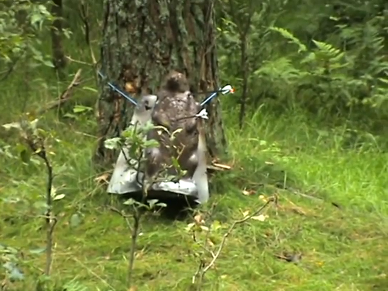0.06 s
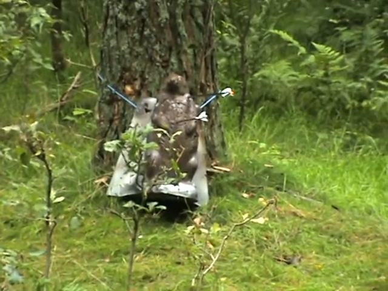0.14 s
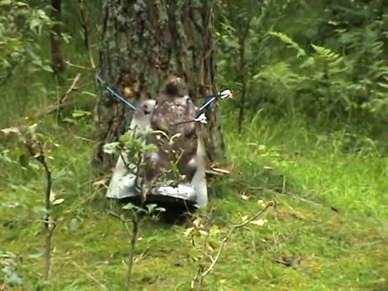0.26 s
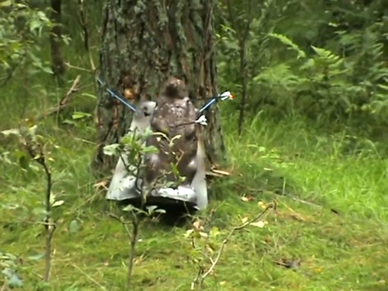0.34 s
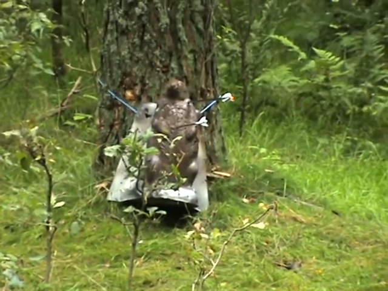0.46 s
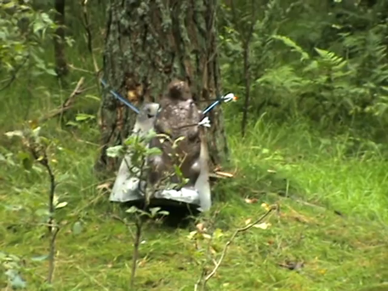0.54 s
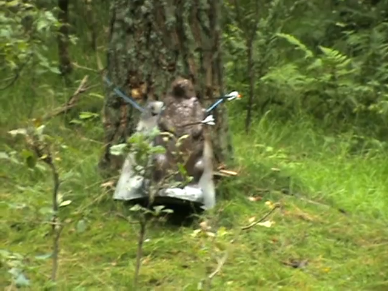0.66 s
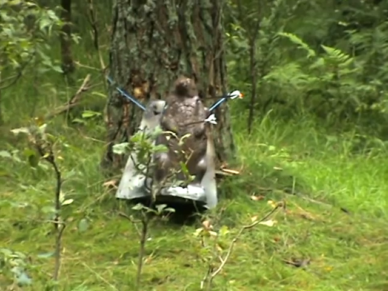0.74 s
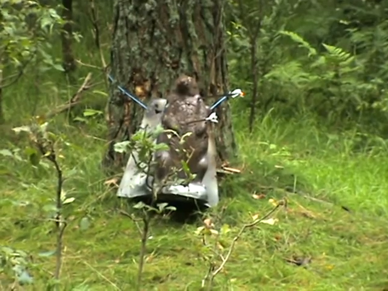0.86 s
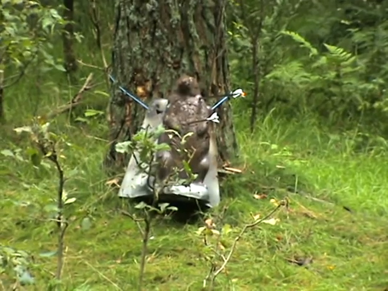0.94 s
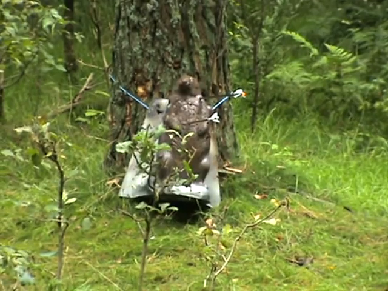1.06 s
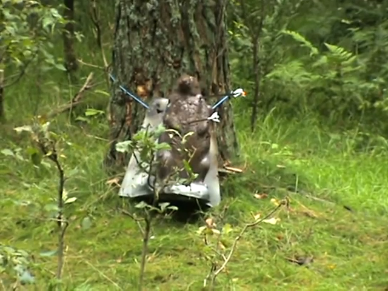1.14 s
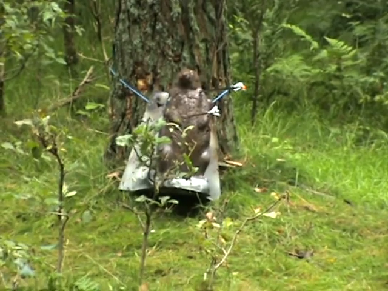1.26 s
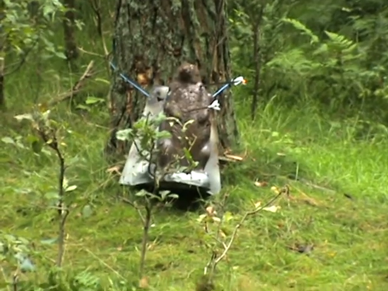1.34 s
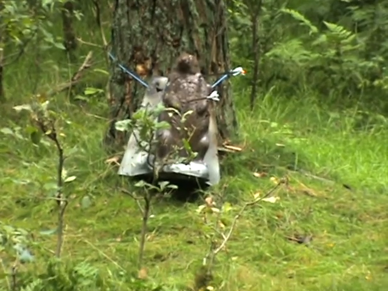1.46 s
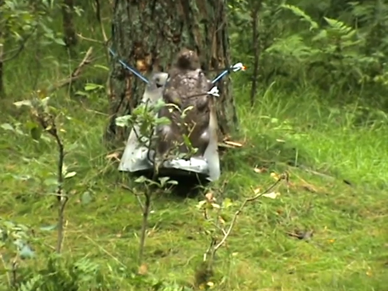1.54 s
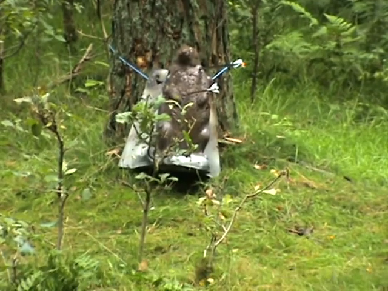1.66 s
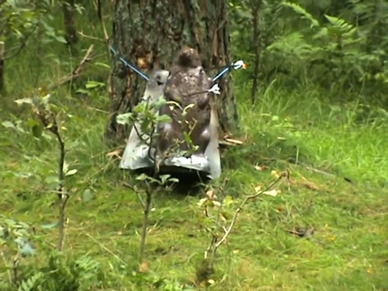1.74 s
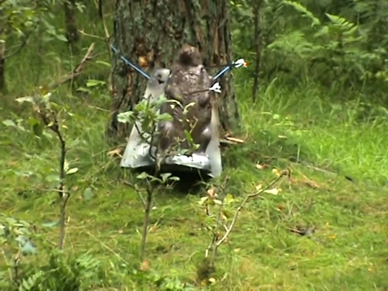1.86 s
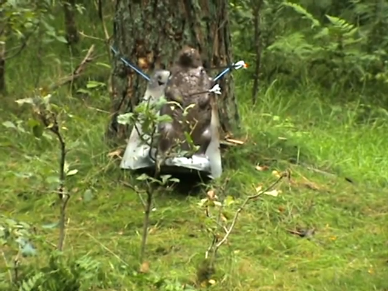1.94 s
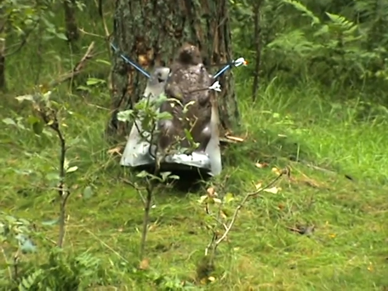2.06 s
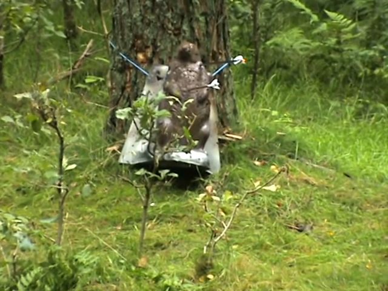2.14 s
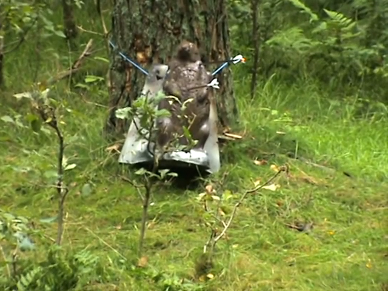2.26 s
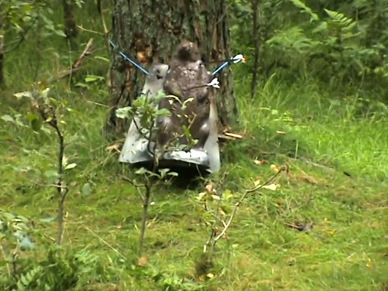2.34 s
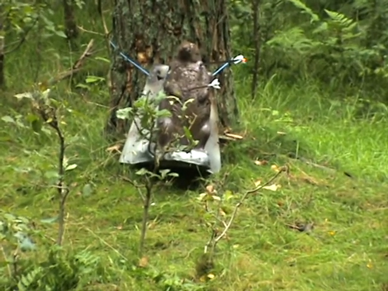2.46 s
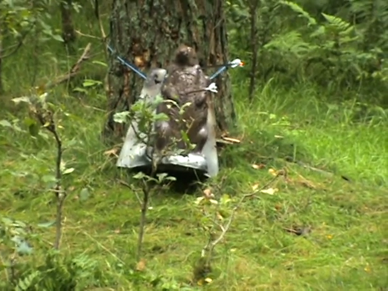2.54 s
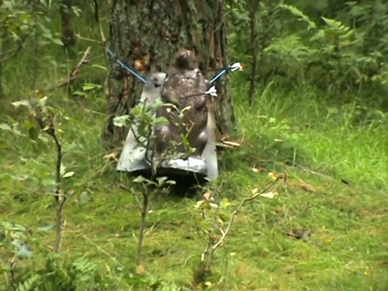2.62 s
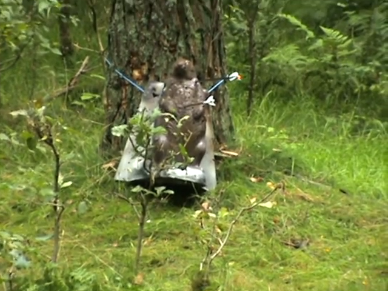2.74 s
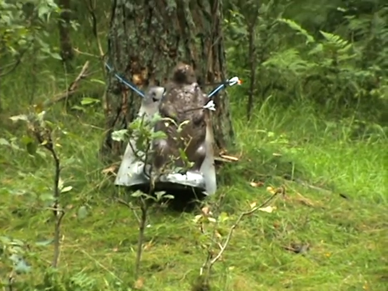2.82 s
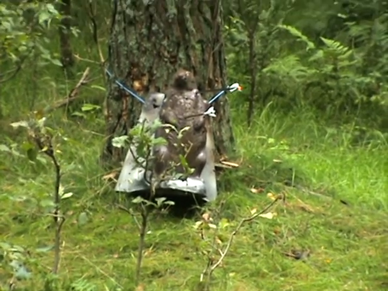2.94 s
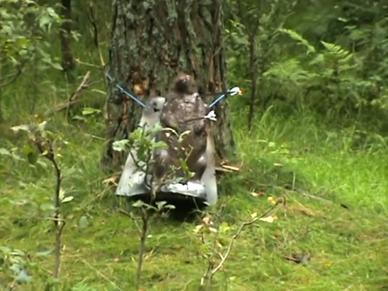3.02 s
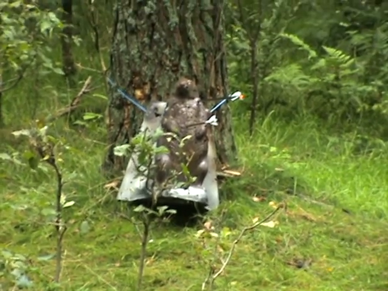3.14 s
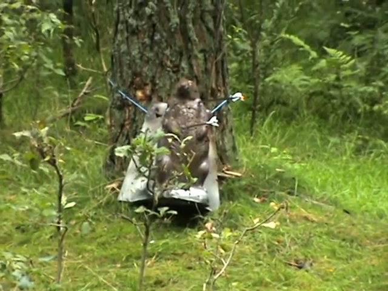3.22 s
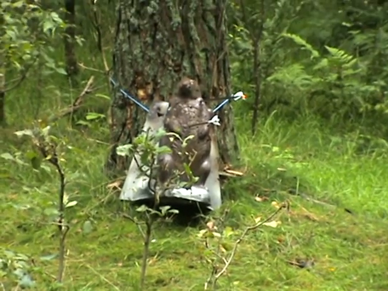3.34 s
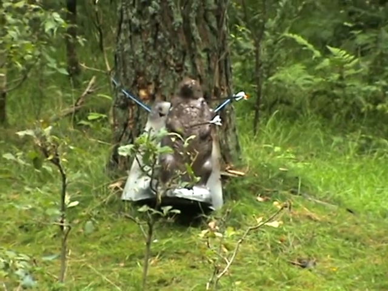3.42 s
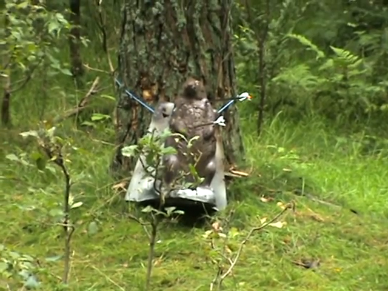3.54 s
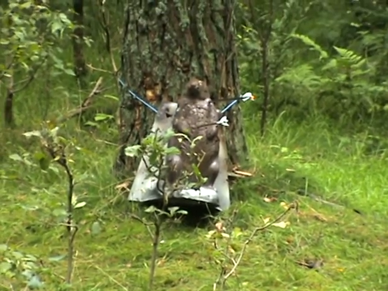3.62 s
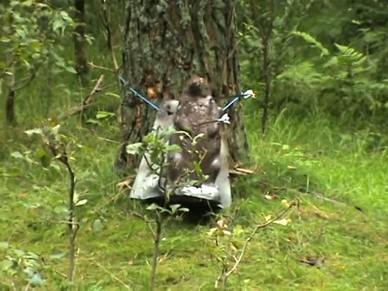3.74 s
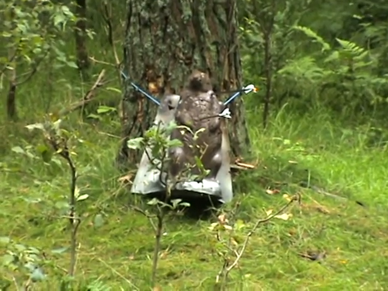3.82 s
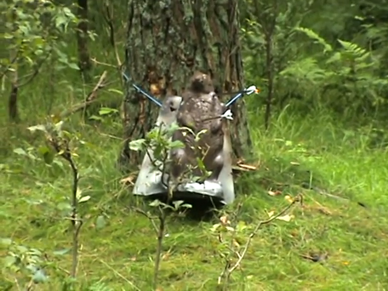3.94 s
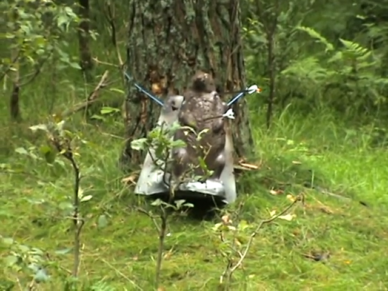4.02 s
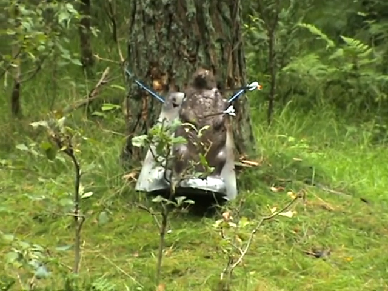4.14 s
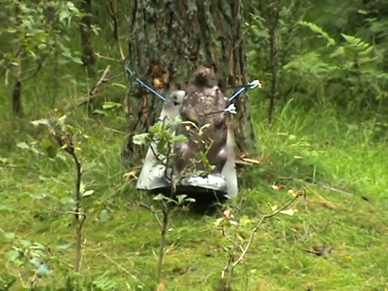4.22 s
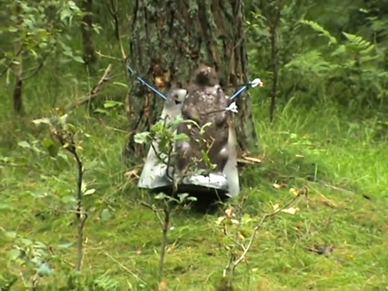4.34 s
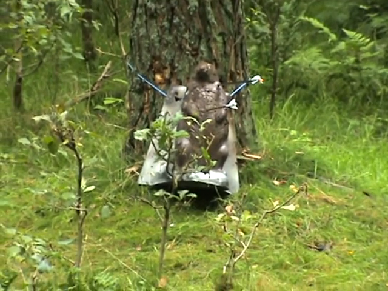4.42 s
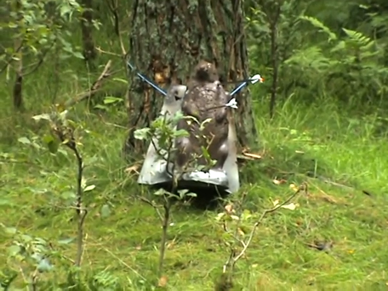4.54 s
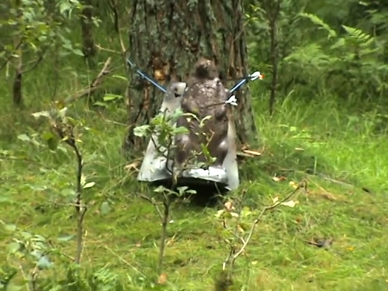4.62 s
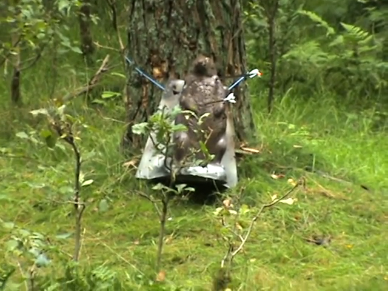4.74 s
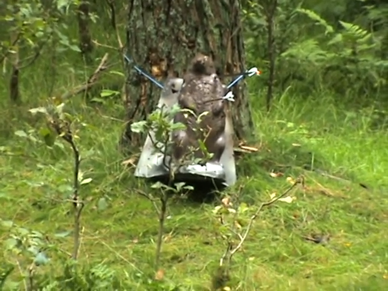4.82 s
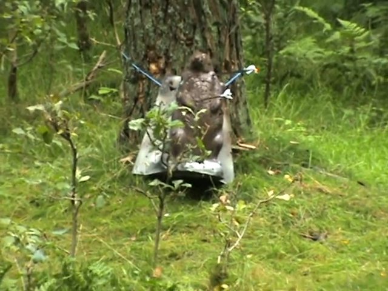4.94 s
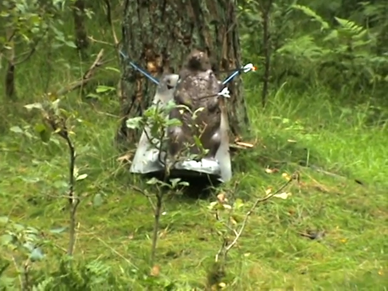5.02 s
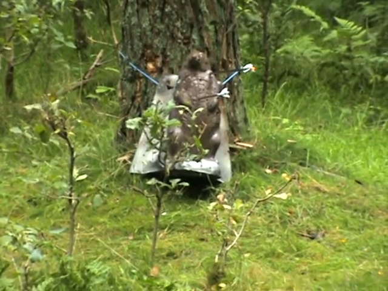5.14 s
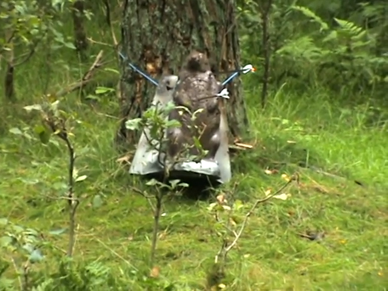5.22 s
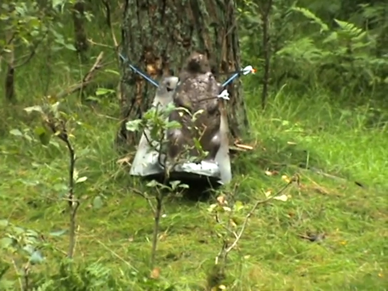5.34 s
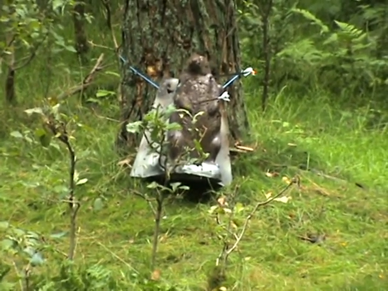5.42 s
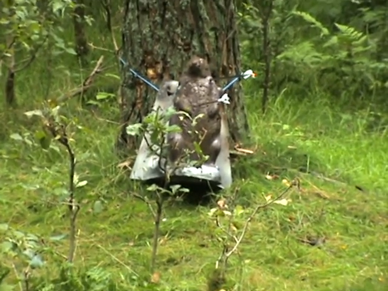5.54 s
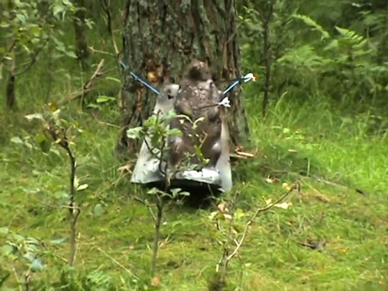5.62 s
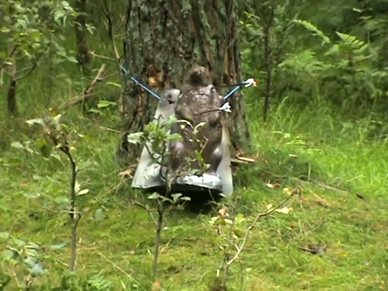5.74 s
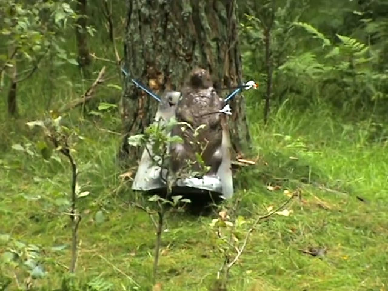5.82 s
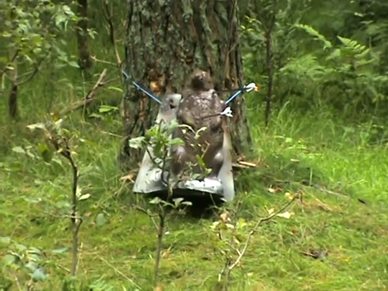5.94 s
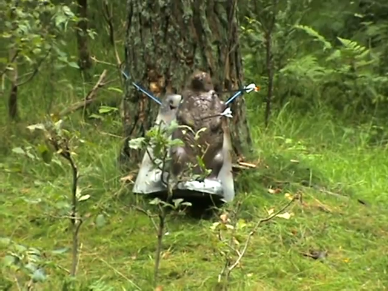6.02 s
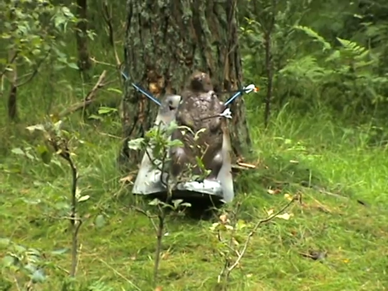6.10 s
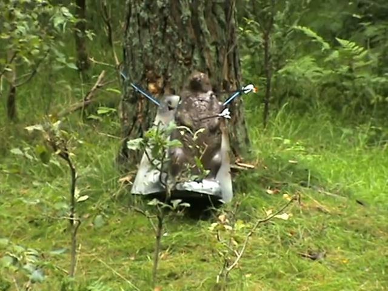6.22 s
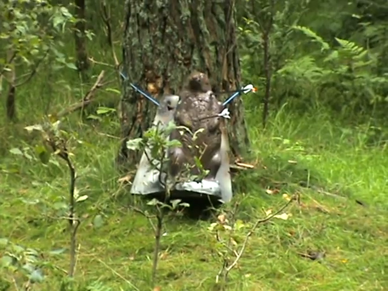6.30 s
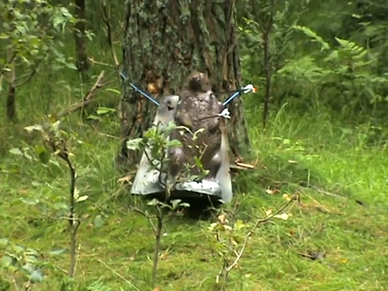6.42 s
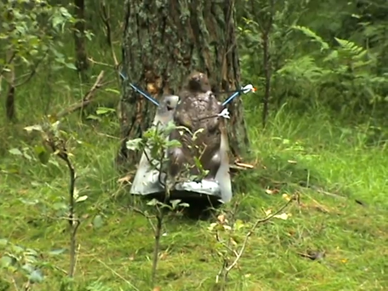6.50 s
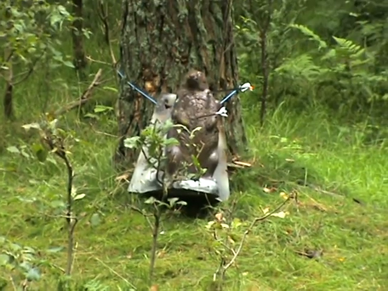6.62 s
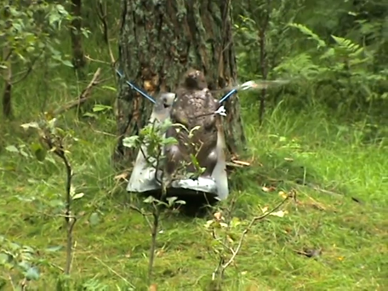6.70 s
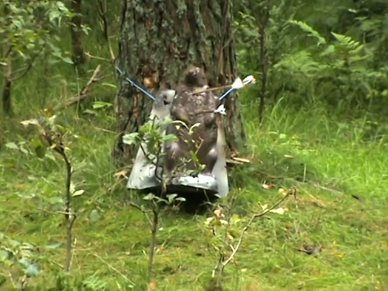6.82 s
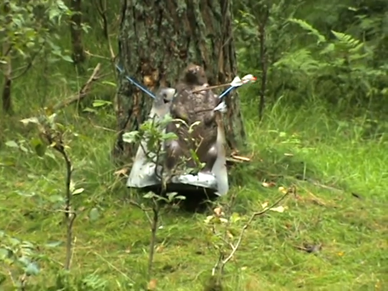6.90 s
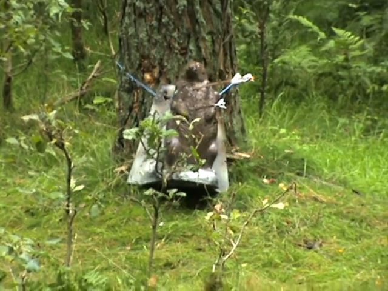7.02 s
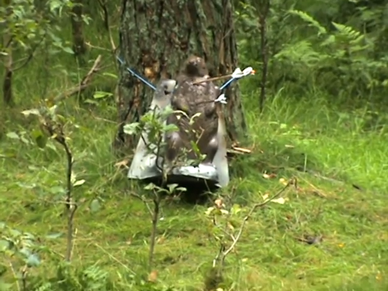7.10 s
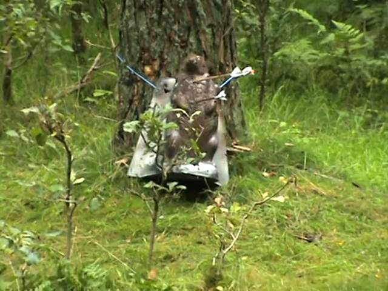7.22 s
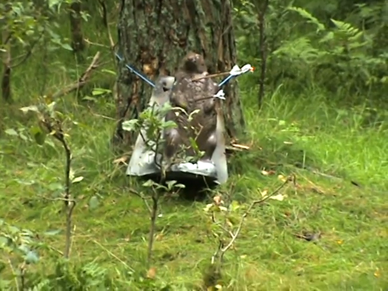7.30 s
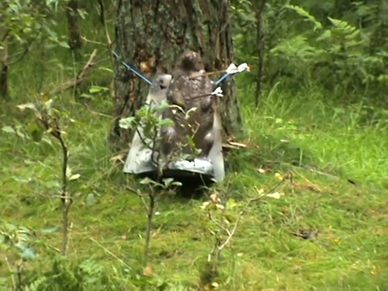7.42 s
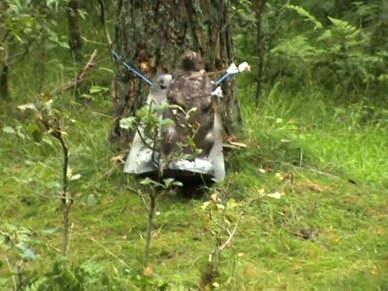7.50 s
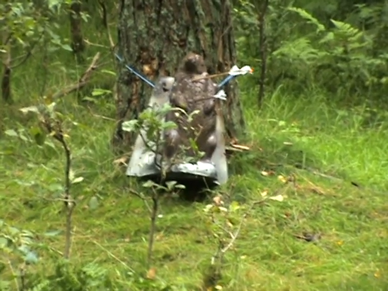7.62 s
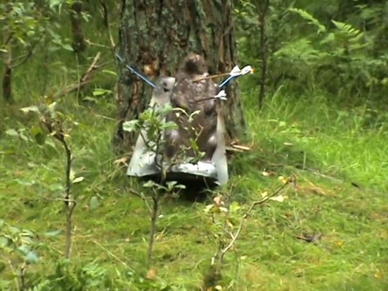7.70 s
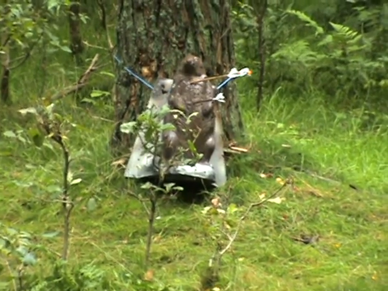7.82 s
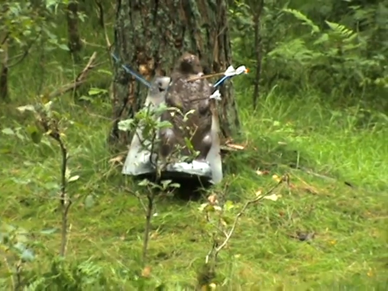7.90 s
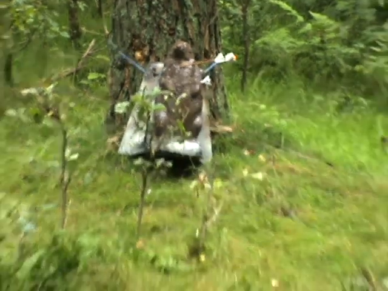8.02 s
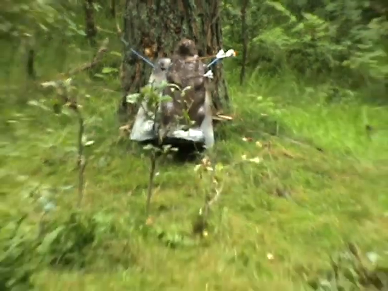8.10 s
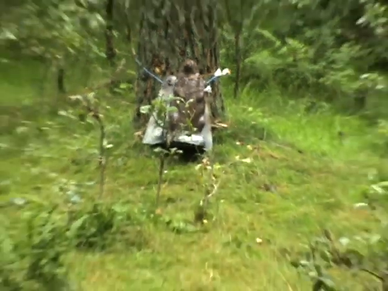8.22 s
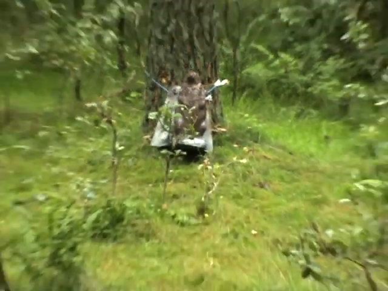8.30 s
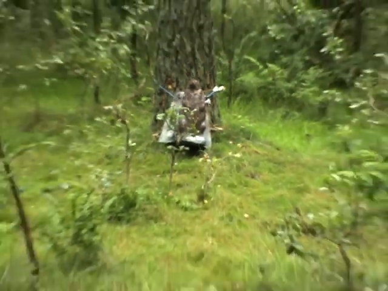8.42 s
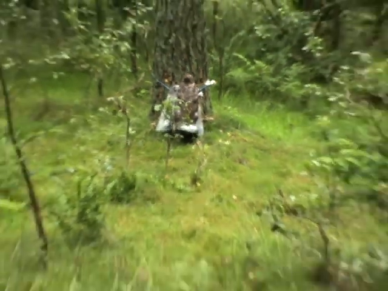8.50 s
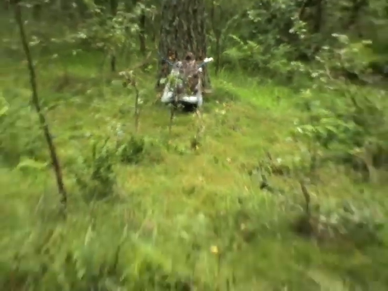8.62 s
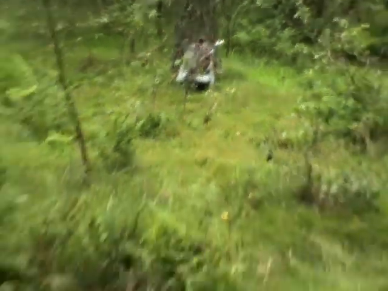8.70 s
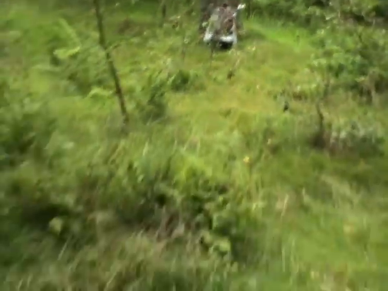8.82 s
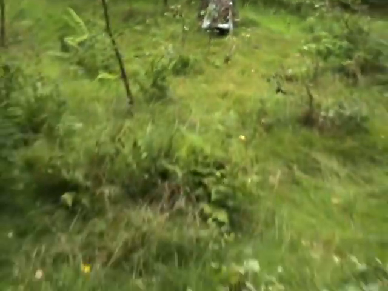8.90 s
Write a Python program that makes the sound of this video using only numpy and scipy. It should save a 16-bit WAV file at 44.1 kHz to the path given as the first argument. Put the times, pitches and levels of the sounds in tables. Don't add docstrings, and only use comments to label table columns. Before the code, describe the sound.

In a quiet wood, faint handling clicks and thin birdsong, then a bowstring slaps and an arrow cracks into a foam target with woodland echo.

```python
import sys
import numpy as np
from scipy import signal
from scipy.fft import rfft, irfft, next_fast_len
from scipy.io import wavfile
from scipy.ndimage import uniform_filter1d

SR = 44100
rng = np.random.default_rng(int(sys.argv[2]) if len(sys.argv) > 2 else 0)


def field_ratio(decibels):
    return 10 ** (np.asarray(decibels, dtype=float) / 20)


def file_out(sig):
    cols = np.atleast_2d(sig).T
    lim = np.clip(cols, -1, 1)
    pcm = np.round(lim * 32767).astype(np.int16)
    wavfile.write(sys.argv[1], SR, pcm)


N = 394694
SHOT_S = 6.5

# [t/s, peak level/dB, brightness/dB]
SLAPS = [(6.5774, -26, -16), (6.5785, -24.5, -18.5), (6.5810, -22, -11.5), (6.582, -25.5, -19),
         (6.5894, -23, -8.5), (6.5940, -17, -8.5), (6.5948, -6, -7), (6.5963, -11.5, 4.5),
         (6.5990, -19.5, -8.5), (6.6015, -19.5, -14), (6.605, -23, -9), (6.6073, -16.5, -7),
         (6.6092, -16, 4), (6.611, -20, -5.5), (6.6136, -8.5, -11.5), (6.6176, -7, -16),
         (6.6205, -21, -10.5), (6.6214, -8, -11), (6.6233, -23, 4), (6.625, -16.5, 4), (6.6320, -15, -14),
         (6.644, -22.5, -22.5), (6.652, -25, -10), (6.653, -20, -9), (6.658, -23, -14), (6.661, -19, 0.5),
         (6.665, -17.5, -6.5), (6.6897, -24, -12.5), (6.698, -29, -1.5), (6.706, -25, -2)]
# [f/Hz, level/dB, t60/s]
BOW_MODES = [(823, -13.5, 0.11), (1045, -4, 0.06), (1187, -7.5, 0.067), (1540, -0.5, 0.043),
             (1800, -16, 0.076), (2157, -1.5, 0.035), (2490, -1, 0.043), (2716, -2, 0.025)]
# [f/Hz, level/dB per Hz]
STRING_HISS = [(150, -20.5), (520, -18.5), (1100, -7), (2000, 3), (3000, -7), (4000, -6), (8500, -14.5),
               (11000, -26), (15500, -37.5)]
# [t/s, f/Hz]
SLAP_PITCH = [(6.581, 2290), (6.5945, 1630), (6.597, 2350), (6.609, 1700), (6.6134, 2500), (6.6175, 2600),
              (6.622, 2100), (6.66, 2500), (6.706, 1900)]


def string_slaps():
    out = np.zeros(SR)
    size = 6000
    for s, peak_db, bright_db in SLAPS:
        t60 = 0.019 if s < 6.68 else 0.012
        t, fade = dying(t60, size)
        grit = rng.standard_normal(size) * fade ** 2.7
        bright = resonate(resonate(grit, 8200, 3200), 7300, 6400)
        burst = rms_one(colour(rng.standard_normal(size), STRING_HISS)) * fade
        spike_hz = np.interp(s, *np.transpose(SLAP_PITCH))
        spike_window = np.sin(np.pi * np.minimum(spike_hz * t / 1.3, 1))
        spike = -np.sin(2 * np.pi * spike_hz * t) * spike_window
        modes = np.zeros(size)
        for hz, db, ring_t60 in BOW_MODES:
            strength, sign = rng.standard_normal(2)
            ring = np.sin(2 * np.pi * hz * t) * dying(ring_t60, size)[1]
            modes += field_ratio(db + 0.98 * strength) * np.sign(sign) * ring
        slap = field_ratio(-12.5) * burst + field_ratio(bright_db) * bright + field_ratio(-18.5) * modes + field_ratio(-2) * spike
        add(out, s - SHOT_S, field_ratio(peak_db) * slap)
    return out


# [t/s, f/Hz, peak level/dB, t60/s]
LIMBS = [
    (6.577, 724, -32.5, .06),
    (6.590, 53, -34, 0.19),
    (6.597, 190, -32.5, 0.36),
    (6.589, 315, -23, 0.054),
    (6.597, 960, -25.5, 0.047),
    (6.6, 750, -34.5, 0.23),
]


def limb_swings():
    out = np.zeros(SR)
    size = SR // 2
    for s, hz, db, t60 in LIMBS:
        t, fade = dying(t60, size)
        level = field_ratio(db + 0.95 * drift(60)[:size])
        add(out, s - SHOT_S, level * np.minimum(t / 0.0041, 1) * np.sin(2 * np.pi * hz * t) * fade)
    return out


def rest_squeak():
    out = np.zeros(SR)
    length_s, start_hz, end_hz = 0.01064, 1350, 3360
    way = np.arange(round(length_s * SR)) / SR / length_s
    hz = start_hz + (end_hz - start_hz) * way
    add(out, 6.5855 - SHOT_S, field_ratio(-25.5) * way ** 0.81 * np.sin(2 * np.pi * np.cumsum(hz) / SR))
    return out


# [t/s, level/dB]
FLIGHT = [
    (6.576, -61.5),
    (6.579, -44),
    (6.592, -30),
    (6.600, -28.5),
    (6.630, -34),
    (6.665, -38),
    (6.680, -46),
    (6.720, -47),
    (6.738, -48),
    (6.746, -66.5),
]
# [f/Hz, level/dB per Hz]
FLIGHT_HISS = [(130, -15.5), (310, -1.5), (520, -6.5), (760, 4.5), (920, -10), (1500, -7), (2500, -14),
               (4200, -12.5), (8400, -13.5), (10500, -20), (15400, -38)]


def torn_air():
    air = rms_one(colour(rng.standard_normal(SR), FLIGHT_HISS))
    t = np.arange(N) / SR
    effort_db = np.interp(t, *np.transpose(FLIGHT), left=-110, right=-110)
    effort_db = uniform_filter1d(effort_db, size=200) + 2.5 * drift(150)
    return air * field_ratio(effort_db[round(SHOT_S * SR):][:SR])


def release():
    return string_slaps() + limb_swings() + rest_squeak() + torn_air()


# [t/s, peak level/dB, start f/Hz, end
# f/Hz, t60/s]
THUDS = [
    (6.7442, -10, 1780, 1565, 0.014),
    (6.7453, -18, 1034, 946, 0.05),
    (6.7458, -21.5, 691, 640, 0.039),
    (6.7611, -10.5, 1000, 955, 0.029),
    (6.7620, -12, 757, 690, 0.025),
    (6.764, -20.5, 392, 335, 0.051),
    (6.7619, -16.5, 183.3, 157, 0.037),
    (6.7745, -27, 850, 800, .025),
    (6.781, -27.5, 1890, 1800, 0.012),
         (6.7583, -6.5, 1620, 1520, 0.019),
]
# [f/Hz, peak level/dB, t60/s]
QUIVER = [(6170, -35.5, .11), (5350, -45.5, 0.56), (7040, -50, 0.28), (3945, -49, 0.5), (4720, -55.5, .6)]


def thuds():
    out = np.zeros(SR)
    for s, peak_db, start_hz, end_hz, t60 in THUDS:
        t, fade = dying(t60, size=8000)
        hz = end_hz + (start_hz - end_hz) * np.exp(-t / 0.0023)
        tone = np.sin(2 * np.pi * np.cumsum(hz) / SR)
        add(out, s - SHOT_S, field_ratio(peak_db) * fade * np.minimum(t / 0.0007, 1) * tone)
    for hz, db, t60 in QUIVER:
        t, fade = dying(t60, size=12000)
        wobble = field_ratio(2.7 * drift(54)[:12000])
        tone = np.sin(2 * np.pi * hz * t)
        add(out, 6.774 - SHOT_S, field_ratio(db) * wobble * fade * np.minimum(t / 0.0037, 1) * tone)
    return out


# [t/s, peak level/dB, t60/s]
CRACKS = [
    (6.74, -29.5, 0.025),
    (6.743, -20, .01),
    (6.7443, -10, 0.015),
    (6.747, -17.5, .012),
    (6.7510, -23, 0.03),
    (6.757, -18.5, 0.015),
    (6.7597, -12.5, 0.013),
]


def cracks():
    out = np.zeros(SR)
    for s, peak_db, t60 in CRACKS:
        add(out, s - SHOT_S, field_ratio(peak_db) * rng.standard_normal(4000) * dying(t60)[1])
    return out


# [f/Hz, width/Hz, level/dB]
SHAFT = [(2694, 120, -5.5), (3600, 89, -17), (3890, 110, -12), (4700, 90, -2), (5290, 110, -0.5),
         (6180, 130, 2), (7040, 140, -1), (7750, 140, -9.5), (8550, 400, -11.5), (9800, 403, -12),
         (10500, 270, -8)]


def shaft(crack):
    out = 0
    for k, (hz, width_hz, db) in enumerate(SHAFT):
        out = out + field_ratio(db) * (-1) ** k * resonate(crack, hz, 1.9 * width_hz)
    return out


# [f/Hz, level/dB per Hz]
BLOW = [(100, 0), (230, 9.5), (500, -6), (800, 3), (1500, -3), (3000, -8.5), (6000, -9), (8500, -22.5),
        (11500, -34), (15000, -45)]


def scattered(hz):
    power = field_ratio(at_hz(BLOW, hz)) ** 2
    for peak_hz, width_hz, db in SHAFT:
        power = power + field_ratio(db + 0.5) ** 2 / (1 + (2 * (hz - peak_hz) / width_hz) ** 2)
    return np.sqrt(power)


def far_blow():
    blow = np.zeros(SR)
    blow[round((6.759 - SHOT_S) * SR)] = 1
    late = np.roll(blow, round(0.32 * SR))
    blow += field_ratio(-17) * resonate(late, 900, 1500)
    return spectral(blow, scattered)


def impact():
    crack = cracks()
    tear = bandpass(crack, 400, 5000, order=1)
    return thuds() + field_ratio(-5) * tear + field_ratio(4) * shaft(crack)


# [f/Hz, t60/s]
WOOD_T60 = [(100, 0.35), (400, 0.48), (1000, 0.69), (2500, 0.72), (6000, 0.61), (10000, 0.53),
            (15000, 0.62)]


def trunks(x):
    white = rng.standard_normal((2, SR))
    t = np.arange(SR) / SR
    edges = 60 * 2 ** np.arange(0, 8.1, .5)
    tail = 0
    for low_hz, high_hz in zip(edges, edges[1:]):
        t60 = at_hz(WOOD_T60, np.sqrt(low_hz * high_hz))
        tail = tail + bandpass(white, low_hz, high_hz) * dying(t60, size=SR)[1]
    mid, side = tail * np.minimum(t / 0.0053, 1) / np.sqrt(SR * 0.053)
    echoes = np.array([mid + 0.436 * side, mid - 0.2 * side])
    return signal.fftconvolve(x[None], echoes, axes=1)


def click(hz, bright_db, top_hz, t60, attack_s):
    t, fade = dying(t60)
    white = rng.standard_normal(4000)
    knock = np.sin(2 * np.pi * hz * t) * fade * np.minimum(t / attack_s, 1)
    knock += field_ratio(5.5) * resonate(white * fade, hz * 1.28, 650)
    sharp = white * (field_ratio(-17.5) * dying(t60 * 6.2)[1] + dying(0.0027)[1])
    spit = field_ratio(bright_db + 9.5) * bandpass(sharp, 1800, top_hz, order=3)
    return field_ratio(-1.5) * (knock + spit)


# [t/s, peak level/dB, body f/Hz, left-right level/dB]
KNOCKS = [(.340, -53, 900, -2), (.796, -51, 750, 4), (0.8434, -40, 1170, -5), (.847, -45, 900, -4),
          (.877, -53, 1500, -4), (.887, -54, 1490, -4), (1.13, -48.5, 1240, -2), (1.170, -50.5, 1170, -3),
          (1.3495, -45, 1290, -1), (1.353, -48, 800, -1), (1.032, -50, 1200, -2), (1.137, -49, 1100, -2),
          (1.513, -51, 760, -8), (1.6204, -52, 1720, -6), (1.654, -44, 1140, -4), (1.656, -57, 800, -4),
          (1.691, -48, 1060, -5), (1.706, -45, 1120, -2), (1.723, -46, 910, -4), (2.124, -50.5, 1080, -3),
          (2.743, -54, 1400, -2), (2.816, -56, 750, -8), (3.807, -56, 2220, 0), (4.487, -50, 2230, -3),
          (5.101, -50, 1380, 3), (5.578, -47.5, 1400, 2), (5.852, -46, 1370, 4), (5.855, -49.5, 650, 2),
          (7.4085, -45.5, 1410, 4), (7.830, -44, 1620, 0), (7.850, -52, 2100, 1), (8.364, -47, 1440, -1),
          (8.367, -53, 1950, -1), (8.48, -50, 980, -1), (8.698, -49, 900, 3), (8.727, -49, 1610, -3),
          (8.731, -48, 1200, 1), (8.785, -48.5, 850, -5), (8.88, -49, 810, 2), (8.930, -41.5, 780, -4)]


def shell_knocks():
    out = np.zeros((2, N))
    for s, peak_db, hz, lean_db in KNOCKS:
        knock = click(hz, bright_db=-36, top_hz=4500, t60=0.018, attack_s=0.00057)
        add(out, s, pan(field_ratio(peak_db) * knock, lean_db))
    return out


# [t/s, peak level/dB, body f/Hz, brightness/dB, top f/Hz]
SNAPS = [(.341, -55.5, 2000, 5, 4800), (.486, -60, 3000, 9, 11000), (.638, -41.5, 1170, -4, 4400),
         (.641, -45.5, 2000, -8, 4600), (0.9081, -42.5, 1090, 4.5, 9800), (0.9112, -39, 1040, 0.5, 8800),
         (.9152, -47, 900, -12, 12000), (1.028, -43, 900, -3.5, 7000), (1.043, -48, 900, -5, 7000),
         (1.6087, -34.5, 1100, -2, 9250), (1.6123, -41, 1630, -9, 8900), (1.873, -47, 920, -12, 8000),
         (2.813, -45.5, 1440, 5, 6940), (2.824, -53, 3880, 5, 6500), (2.850, -52, 3300, -1, 5000),
         (7.047, -53, 3500, 3, 6500), (8.548, -59, 3500, 0.5, 10020), (8.786, -62, 4000, 3, 7000)]


def bright_snaps():
    out = np.zeros((2, N))
    for s, peak_db, hz, bright_db, top_hz in SNAPS:
        snap = click(hz, bright_db, top_hz, t60=0.01, attack_s=.00023)
        add(out, s, pan(field_ratio(peak_db) * snap, -7))
    return out


# [t/s, peak level/dB, f/Hz, t60/s]
THUMPS = [(0.339, -55, 565, 0.046), (0.638, -49.5, 340, 0.034), (0.8789, -40.5, 402, 0.021),
          (0.910, -44, 396, 0.017), (0.9147, -35, 460, 0.01), (0.994, -51, 400, .04),
          (1.029, -47, 394, 0.034), (1.108, -50, 486, 0.051), (1.136, -47, 426, 0.018),
          (1.3505, -42.5, 370, 0.028), (1.039, -46, 455, .025), (1.69, -46.5, 407, 0.077),
          (1.71, -49, 320, 0.035), (1.723, -47.5, 426, 0.035), (8.7238, -35, 169, 0.024),
          (8.749, -47, 248, .03), (8.879, -48, 234, 0.14), (8.929, -45, 431, 0.03)]


def finger_thumps():
    out = np.zeros((2, N))
    for s, peak_db, hz, t60 in THUMPS:
        t, fade = dying(t60)
        thump = np.minimum(t * hz / 0.26, 1) * np.sin(2 * np.pi * hz * t) * fade
        add(out, s, pan(field_ratio(peak_db) * thump, -3.5))
    return out


# [f/Hz, left lead/rad]
PORTS = [(60, -0.77), (340, 0.74), (950, -0.87), (2000, -0.51), (4600, -0.45), (9000, -0.35), (15000, 0.19)]


def from_right(x):
    half_turn = 0.5j * np.array([[1], [-1]])
    return spectral(x, lambda hz: np.exp(half_turn * at_hz(PORTS, hz)))


# [t/s, hold/s, dull level/dB, crisp level/dB, dry top
# level/dB]
MOVES = [(0.0, 0.037, -73.5, -68, -72), (0.324, 0.49, -71.5, -70, -84), (0.414, 0.021, -83, -66, -75),
         (0.473, 0.016, -77, -73, -70), (0.555, 0.062, -85, -67.5, -78), (0.914, 0.063, -68.5, -70.5, -78),
         (1.025, 0.02, -65, -63, -66.5), (1.074, 0.1, -69, -67.5, -76), (1.23, 0.02, -68, -60.5, -78),
         (1.257, 0.017, -68, -63, -74), (1.334, 0.21, -70.5, -74.5, -79), (1.626, 0.017, -65.5, -70, -76),
         (1.68, 0.023, -63.5, -71, -80), (1.764, 0.12, -81, -70, -80), (6.996, 0.21, -67.5, -72.5, -91),
         (2.814, 0.03, -69, -72, -86), (7.98, 0.96, -69, -72.5, -80), (8.444, 0.047, -80, -77, -79),
         (8.525, 0.022, -81, -70, -70), (8.604, 0.038, -83, -69, -69.5), (8.708, 0.028, -65, -82, -85),
         (8.877, 0.077, -66, -72, -85),
         (7.3, 0.66, -73, -77, -88),
    (7.96, .2, -70, -72, -82),
]


def rustle():
    power = np.zeros((3, N))
    for s, hold_s, *levels_db in MOVES:
        shape = swell(hold_s, attack_s=0.0061, t60=0.34)[1]
        add(power, s, (field_ratio(levels_db)[:, None] * shape) ** 2)
    rub = power[0] * field_ratio(1) ** 2
    power = np.vstack([power, rub])
    # low Hz, high Hz, grains per second
    bands = [(398, 1440, 4000), (2030, 7800, 5000), (7000, 10300, 5000), (203, 366, 2500)]
    out = 0
    for part_power, (low_hz, high_hz, per_s) in zip(power, bands):
        sizes = field_ratio(4.1 * np.minimum(rng.exponential(1, (2, N)), 5))
        sizes *= rng.choice([-1, 1], (2, N))
        chance = per_s * field_ratio(2.5 * drift(30)) / SR
        grains = sizes * (rng.random((2, N)) < chance)
        mid, side = rms_one(bandpass(grains + 1e-18, low_hz, high_hz))
        out = out + np.sqrt(part_power) * np.array([mid + 0.05 * side, mid - 1.34 * side])
    return out


# [t/s, hold/s, start f/Hz, end f/Hz, level/dB]
ZOOM = [
    (7.98, .05, 628, 900, -61),
    (8.0, 0.024, 745, 1314, -51.5),
    (8.06, 0.63, 1270, 1284, -69.5),
    (8.3, 0.51, 987, 1008, -69),
    (8.34, 0.34, 2500, 2490, -71.5),
]


def zoom():
    return wheeze(ZOOM, blur_hz=80, slide_s=lambda hold_s: 0.044)


# [t/s, hold/s, start f/Hz, end f/Hz, level/dB]
NOTES = [(0.088, 0.22, 7040, 6850, -73.5), (.32, .16, 7000, 7100, -75), (.25, .2, 7950, 7900, -76),
         (.56, 0.17, 7750, 7700, -75), (.72, .12, 7850, 7950, -75), (.84, .05, 8150, 8150, -79),
         (2.24, 0.24, 7050, 6450, -70), (2.3, 0.13, 7300, 7280, -72), (2.35, 0.13, 7040, 6900, -76),
         (2.48, 0.12, 7350, 7150, -68), (2.477, 0.22, 6760, 6820, -70), (2.45, .08, 7960, 7900, -75),
         (3.39, .08, 6900, 6700, -80), (3.56, .1, 6960, 6800, -78), (3.995, 0.11, 7340, 7040, -66),
         (4.177, 0.15, 7220, 6960, -67), (4.32, .03, 7340, 7260, -67), (4.35, 0.12, 7020, 6950, -69.5),
         (4.5, 0.15, 6980, 7000, -77), (4.69, 0.27, 7050, 6980, -75.5), (5.1, .2, 7050, 6950, -77),
         (5.37, 0.1, 7100, 6740, -67.5), (5.57, 0.11, 6700, 6720, -69.5), (5.74, 0.18, 6670, 6870, -74),
         (5.72, 0.2, 7450, 7240, -77), (5.96, .44, 7160, 7190, -80), (6.48, 0.043, 6720, 6800, -73),
         (8.02, 0.14, 7340, 6980, -62), (8.2, 0.21, 7200, 7050, -68)]


def birds():
    return wheeze(NOTES, blur_hz=70, slide_s=lambda hold_s: .45 * hold_s)


def wheeze(rows, blur_hz, slide_s):
    out = np.zeros(N)
    low = signal.butter(2, blur_hz, fs=SR, output="sos")
    blur = rms_one(signal.sosfilt(low, rng.standard_normal((2, N + SR))))
    for s, hold_s, start_hz, end_hz, db in rows:
        t, shape = swell(hold_s, attack_s=.015, t60=.5)
        hz = end_hz + (start_hz - end_hz) * np.exp(-t / slide_s(hold_s))
        phase = 2 * np.pi * np.cumsum(hz) / SR
        a, b = blur[:, round(s * SR):][:, :len(t)]
        tone = a * np.cos(phase) + b * np.sin(phase)
        add(out, s, field_ratio(db - 4 * t / hold_s) * shape * tone)
    return out


# [f/Hz, peak level/dB]
MOTOR = [(839.8, -80), (909.8, -83), (1685, -84), (2210, -81), (2525, -82), (5050, -90)]


def motor_hum():
    t = np.arange(N) / SR
    hum = np.zeros(N)
    for hz, db in MOTOR:
        hum += field_ratio(db + 3 * drift(14)) * np.sin(2 * np.pi * hz * t + 1.5 * drift(20))
    return hum


# [f/Hz, level/dB per Hz]
HISS_SPECTRUM = [(20, -95), (40, -88.5), (65, -86.5), (110, -92.5), (200, -91), (400, -97), (650, -98.5),
                 (800, -100.7), (1400, -103.8), (2300, -105.2), (4000, -108), (7000, -109.5), (11000, -112),
        (16000, -112)]
# [f/Hz, correlation]
LIKENESS = [(60, 0.92), (150, 0.74), (380, -0.45), (950, -0.74), (2380, -0.58), (5980, 0.16), (15000, 0.9)]
# [f/Hz, left-right level/dB]
LEAN = [(60, 0), (240, -5), (950, 2.5), (3770, -0.5), (15000, 0.5)]


def side_gain(hz):
    alike = np.clip(at_hz(LIKENESS, hz), -.95, .99)
    return np.sqrt((1 - alike) / (1 + alike))


def leaf_hiss():
    mid, side = colour(rng.standard_normal((2, N)), HISS_SPECTRUM) * np.sqrt(SR / 2)
    side = spectral(side, side_gain)
    sides = np.array([[1], [-1]])
    hiss = spectral(np.array([mid + side, mid - side]), lambda hz: field_ratio(at_hz(LEAN, hz) / 2 * sides))
    return field_ratio(0.074 * drift(0.81)) * hiss


def rms_one(x):
    return x / np.sqrt(np.mean(x ** 2) + 1e-30)


def at_hz(points, hz):
    table_hz, values = np.transpose(points)
    return np.interp(np.log(np.maximum(hz, 1)), np.log(table_hz), values)


def drift(rate):
    steps = rng.standard_normal(4000)
    return rms_one(np.interp(np.arange(N) / SR * rate, np.arange(4000), steps))


def spectral(x, gains):
    size = next_fast_len(x.shape[-1])
    hz = np.arange(size // 2 + 1) * SR / size
    return irfft(rfft(x, size) * gains(hz), size)[..., :x.shape[-1]]


def colour(x, spectrum):
    return spectral(x, lambda hz: field_ratio(at_hz(spectrum, hz)))


def bandpass(x, low_hz, high_hz, order=2):
    return signal.sosfilt(signal.butter(order, [low_hz, high_hz], "band", fs=SR, output="sos"), x)


def resonate(x, hz, width_hz):
    r = np.exp(-np.pi * width_hz / SR)
    top = np.array([1, 0, -1]) * (1 - r * r) / 2
    return signal.lfilter(top, [1, -2 * r * np.cos(2 * np.pi * hz / SR), r * r], x + 1e-18)


def dying(t60, size=4000):
    t = np.arange(size) / SR
    return t, np.exp(-np.log(1000) * t / t60)


def swell(hold_s, attack_s, t60):
    t = np.arange(round((hold_s + .3) * SR)) / SR
    return t, np.minimum(t / attack_s, 1) * field_ratio(-60 * np.maximum(t - hold_s, 0) / t60)


def add(out, s, piece):
    i = round(s * SR)
    out[..., i:i + piece.shape[-1]] += piece[..., :N - i]


def pan(x, lean_db):
    return np.array([x * field_ratio(lean_db / 2), x * field_ratio(-lean_db / 2)])


def scene():
    bow, hit, far = release(), impact(), far_blow()
    near = shell_knocks() + bright_snaps() + finger_thumps()
    add(near, SHOT_S, pan(bow, -2.0) + pan(hit, -0.405))
    wood = rustle() + leaf_hiss() + motor_hum()
    add(wood, SHOT_S, trunks(field_ratio(-8) * bow + field_ratio(-33) * hit + field_ratio(16.5) * far))
    return from_right(near) + wood + birds() + zoom()


def top_cut(x):
    return signal.sosfilt(signal.butter(12, 16500, fs=SR, output="sos"), x)


def record(dry):
    low_pass = signal.cheby2(8, 60, 17300, fs=SR, output="sos")
    mix = signal.sosfilt(low_pass, dry)
    return top_cut(mix)


dry = scene()
out = record(dry)
file_out(out)
```